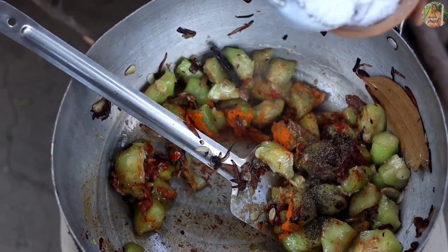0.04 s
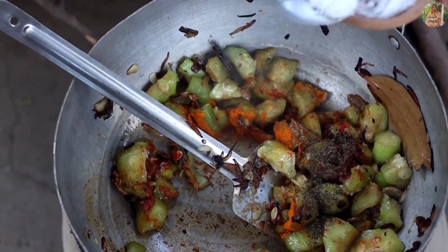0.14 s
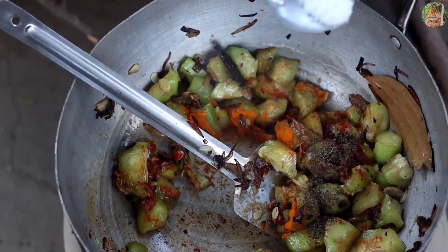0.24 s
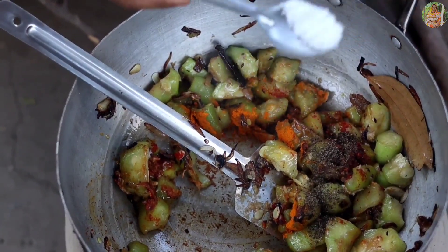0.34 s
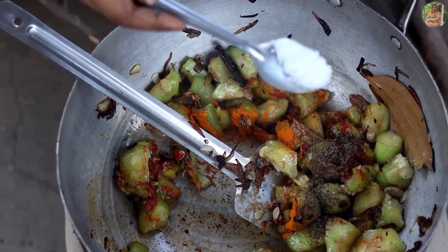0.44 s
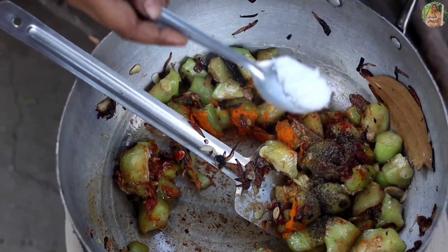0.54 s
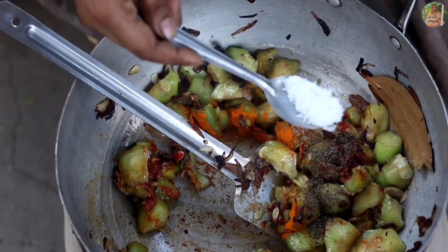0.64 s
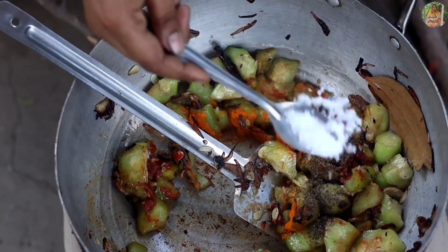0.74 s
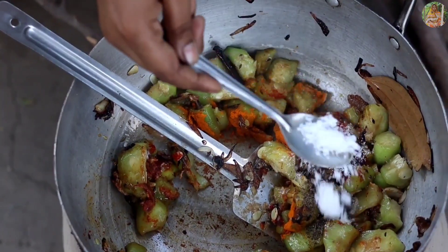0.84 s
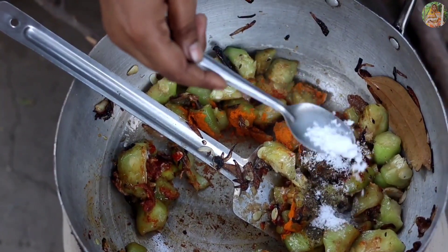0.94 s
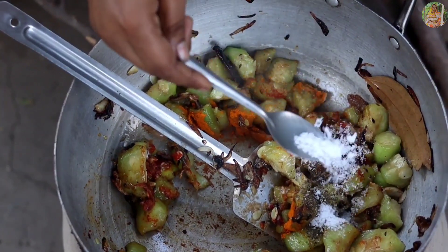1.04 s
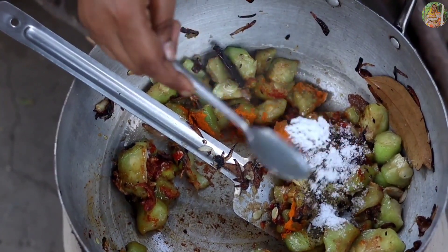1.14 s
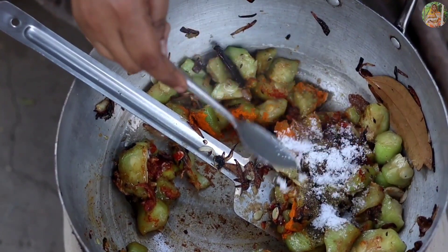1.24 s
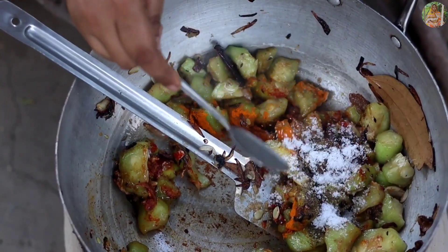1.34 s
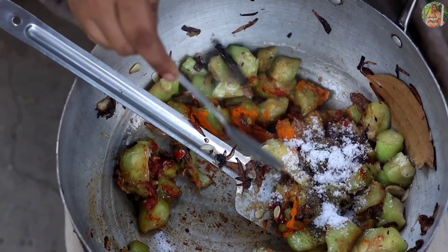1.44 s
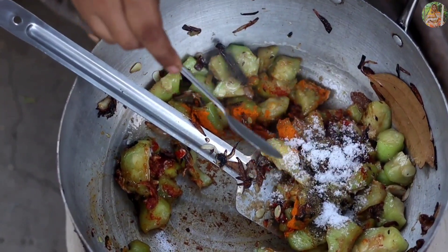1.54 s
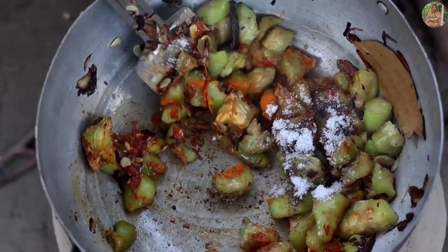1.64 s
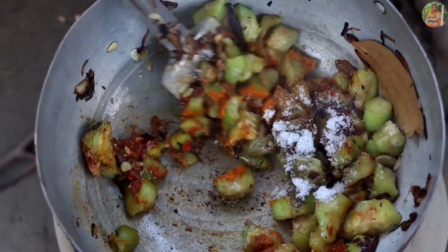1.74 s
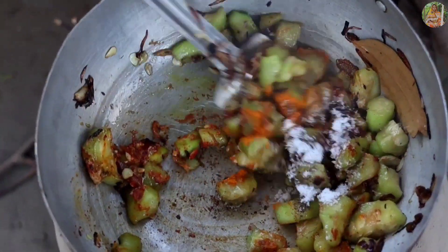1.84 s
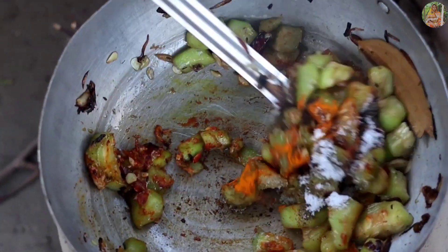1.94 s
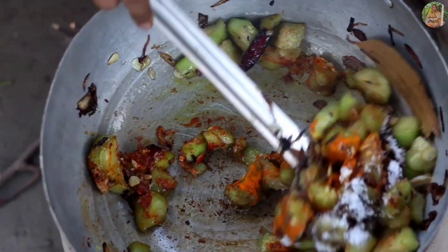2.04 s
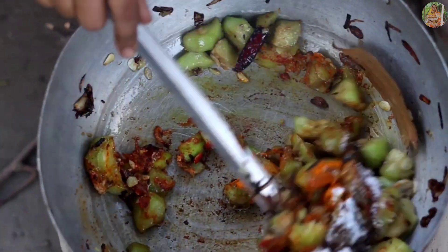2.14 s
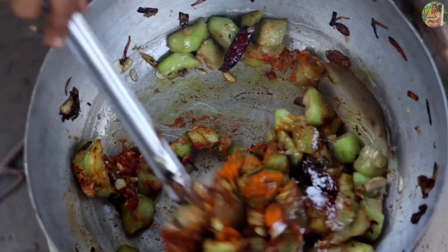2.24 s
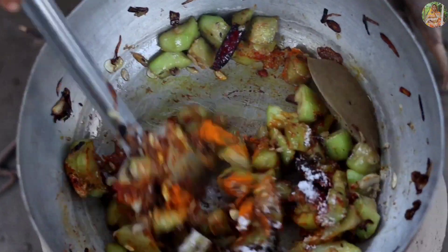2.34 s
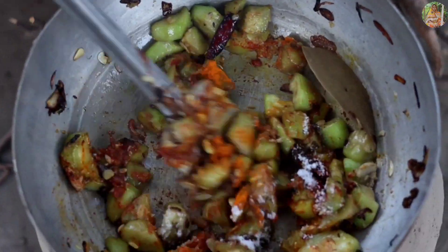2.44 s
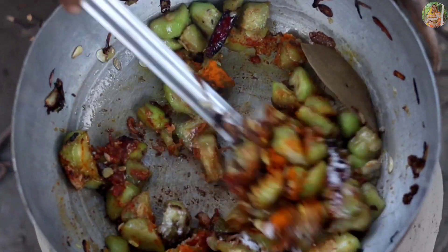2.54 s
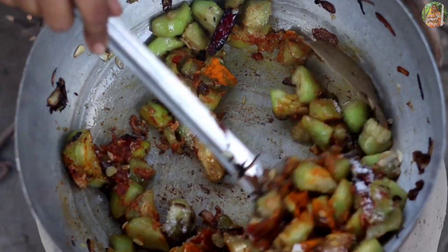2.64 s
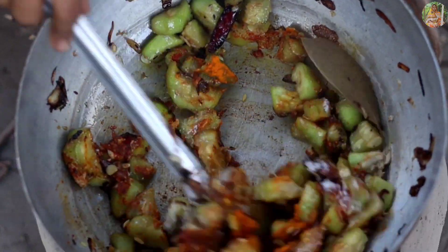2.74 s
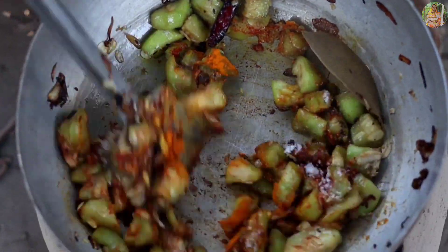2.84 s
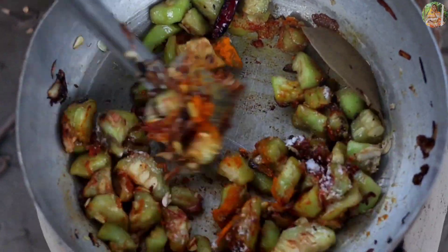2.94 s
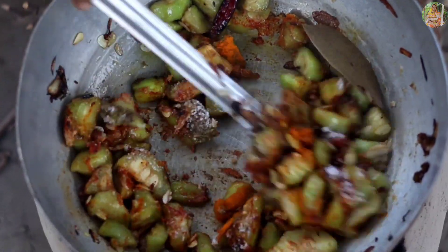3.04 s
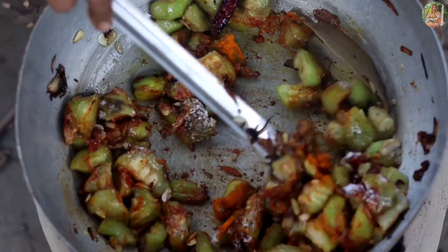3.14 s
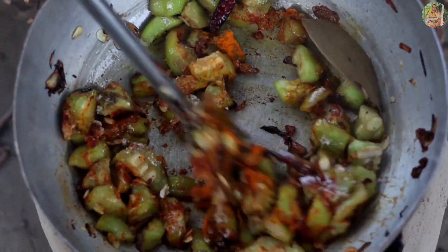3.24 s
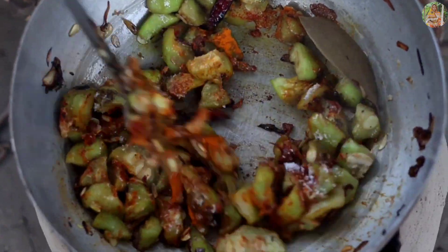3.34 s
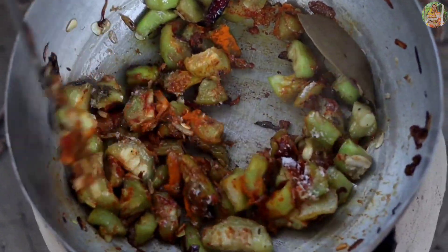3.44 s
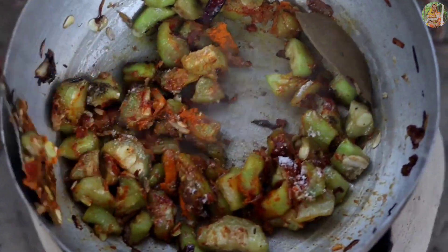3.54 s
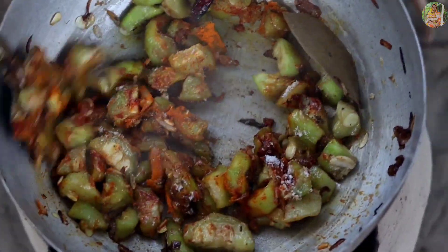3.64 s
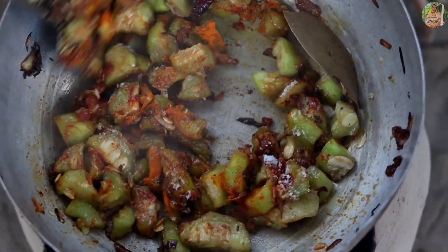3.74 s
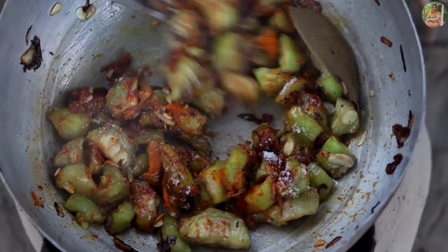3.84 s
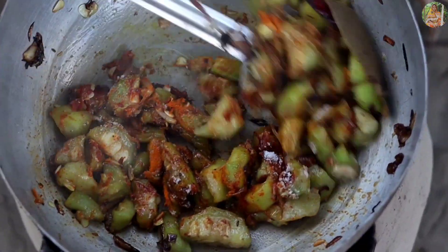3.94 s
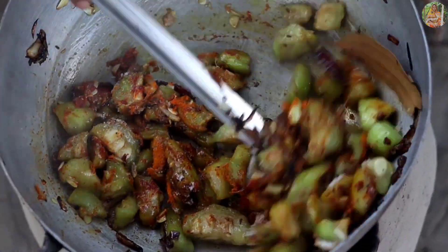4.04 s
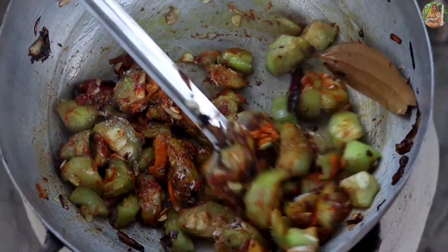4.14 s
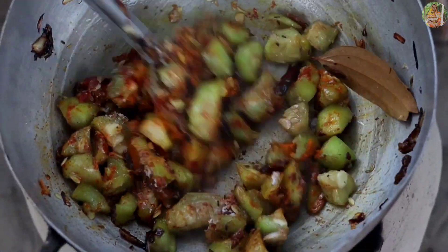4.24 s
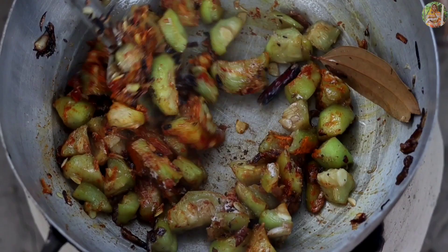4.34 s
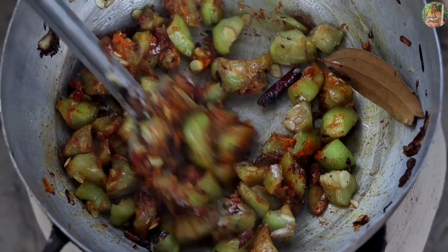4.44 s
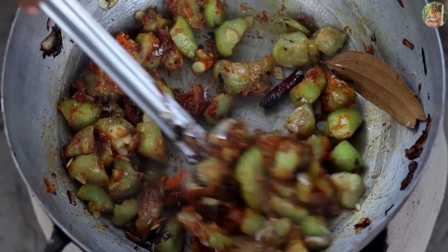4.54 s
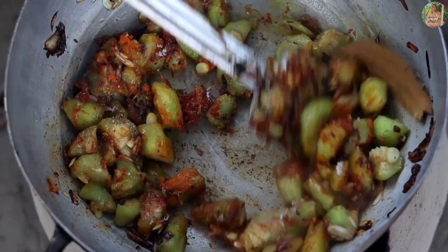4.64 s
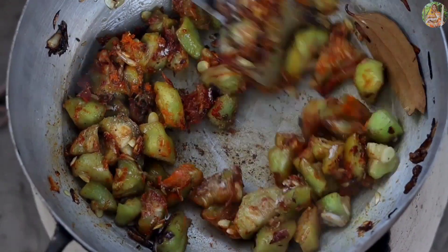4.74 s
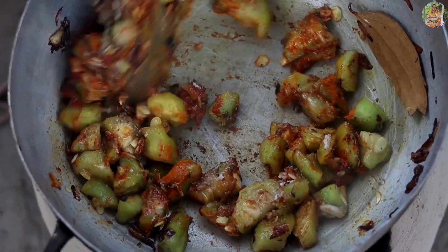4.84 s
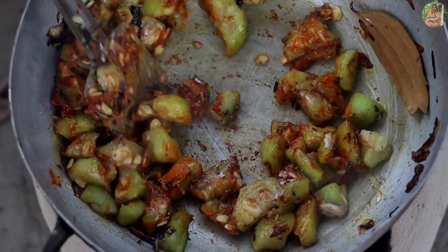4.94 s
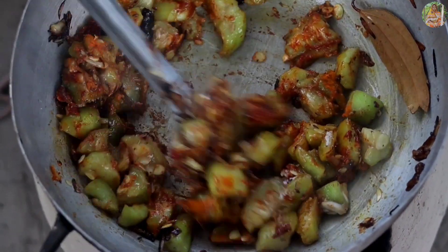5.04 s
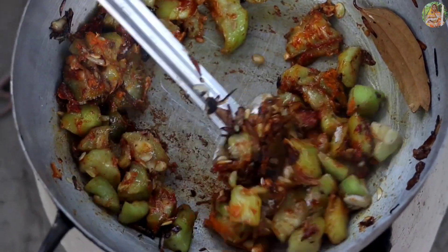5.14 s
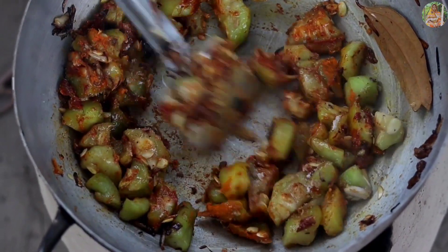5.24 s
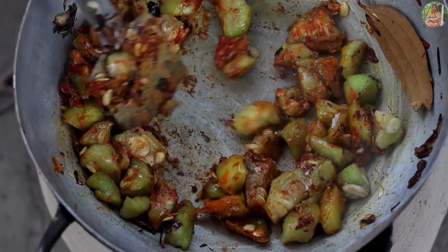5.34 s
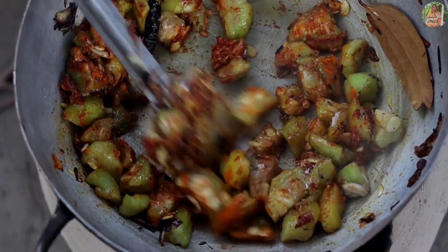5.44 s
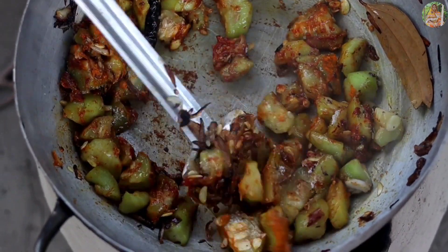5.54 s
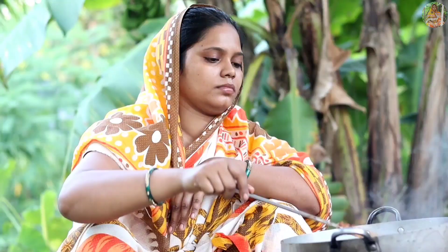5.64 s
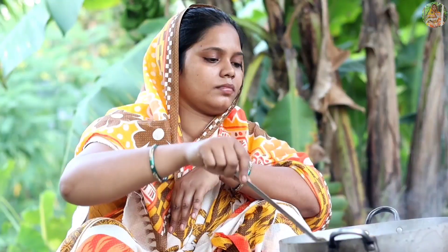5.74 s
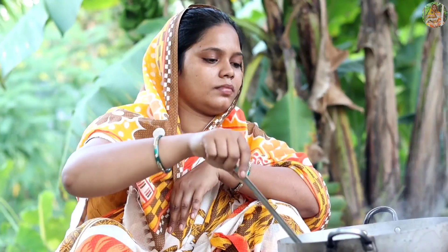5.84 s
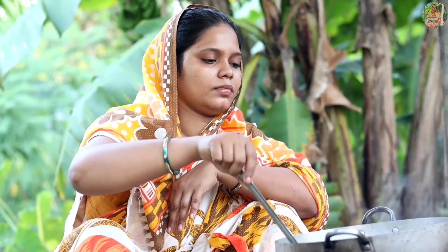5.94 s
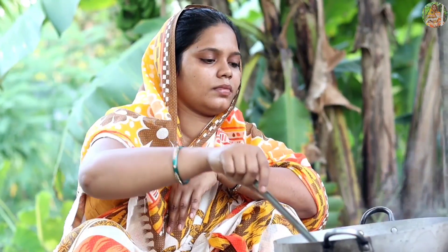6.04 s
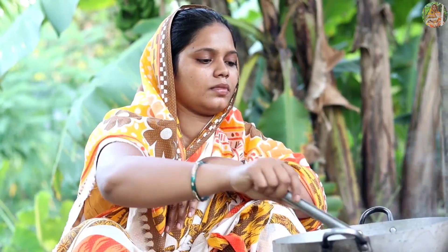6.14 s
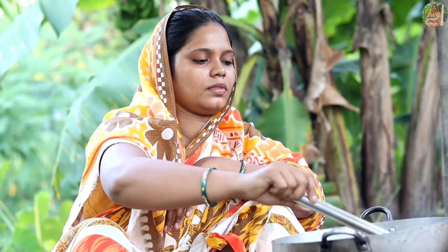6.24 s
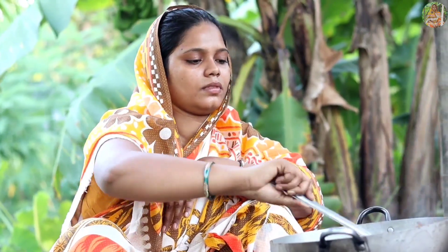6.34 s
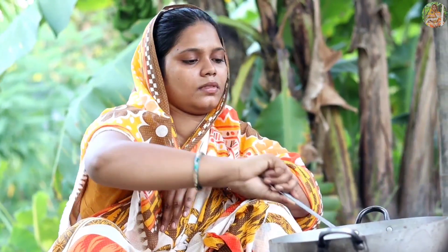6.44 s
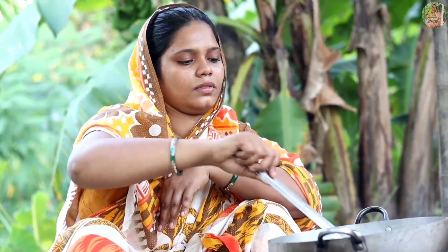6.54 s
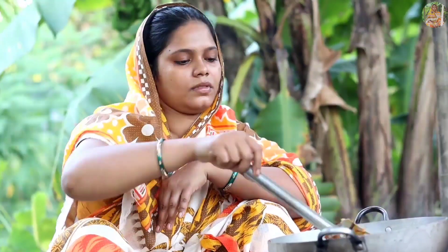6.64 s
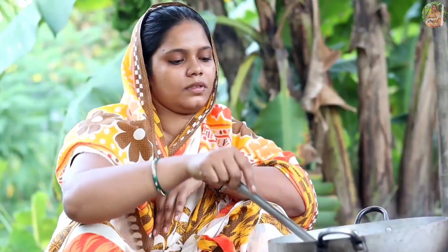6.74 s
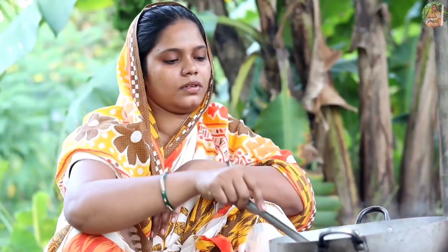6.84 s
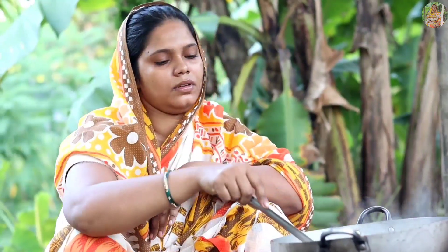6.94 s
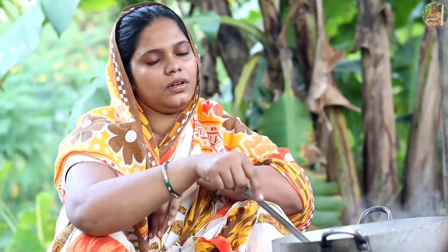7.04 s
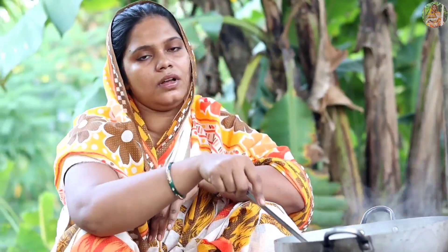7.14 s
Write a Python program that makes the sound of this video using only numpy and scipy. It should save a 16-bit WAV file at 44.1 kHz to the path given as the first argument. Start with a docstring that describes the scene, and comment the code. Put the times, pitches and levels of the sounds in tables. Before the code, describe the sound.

Vegetables sizzle steadily in oil in a wide metal pan, close by and outdoors. Salt patters lightly on them, then a metal spatula turns the food, each turn flaring into a hiss, with scrapes, brief squeaks and light knocks. Near the end the pan is a few steps away, with a faint sizzle, short scrapes and two knocks. Distant engines drone faintly over a low rumble.

```python
"""A steady sizzle is heard first: vegetables fry outdoors in a wide metal pan, as tiny steam bursts in oil.
Salt patters on them; then a metal spatula turns them, and each turn flares into a hiss. Stick-slip
friction makes the blade scrape and squeak; its knocks and one soft thud of falling food ring the pan.
Near the end the pan is a few steps away: a faint sizzle, short scrapes and two knocks.
Far engines drone over a low rumble."""
import sys
import numpy as np
from scipy import signal
from scipy.fft import rfft, irfft, next_fast_len
from scipy.io import wavfile

SR = 44100
rng = np.random.default_rng(int(sys.argv[2]) if len(sys.argv) > 2 else 0)


def transcribe(signal):
    """Save signal, clipped to [-1, 1], as a 16-bit WAV file at the path in sys.argv[1]."""
    frames = np.atleast_2d(signal).T
    limited = np.clip(frames, -1, 1)
    pcm = np.round(limited * 32767).astype(np.int16)
    wavfile.write(sys.argv[1], SR, pcm)


N = 316880
T = np.arange(N) / SR

# sizzle spectra of resting food, stirred food and the pan from afar: (frequency [Hz], gain [dB])
RESTING_SPECTRUM = [(88, -70), (150, -30), (436, -12.5), (471, -15), (618, -12), (985, -16), (1150, -12),
                    (1400, -10.5), (1600, -6.5), (1830, -8.5), (2230, -6), (8170, -3), (15500, -20.5)]
STIRRED_SPECTRUM = [(88, -53), (150, -20), (285, -19), (445, -9.5), (530, -12.5), (1630, -8), (1910, -8.5),
                    (4650, -2.5), (6600, -3), (8490, 1), (10700, -6), (13300, -5.5), (15500, -12)]
FAR_SPECTRUM = [(71, -24), (120, -8.5), (216, -13), (367, -11), (509, -6.5), (552, -14), (704, -18),
                (863, -14), (936, -20), (1080, -16.5), (1190, -19.5), (1410, -12.5), (1650, -15),
                (8770, -10), (15500, -29)]
# resonances (+) and hollows (-) of the pan's bowl: (frequency [Hz], width [Hz], gain [dB])
BOWL_RESONANCES = [(453, 68, 1), (1080, 37, 1.5), (1626, 150, 3.5), (1913, 240, -3.5), (6570, 720, -2.5),
                   (8270, 1500, 1), (10850, 1260, -4.5), (12700, 2100, 1)]
# spatula turns: (time [s], push length [s], level [dB], relative spatter [dB], relative spray [dB])
FOOD_TURNS = [(1.75, .21, -27.5, -4, -4), (2.15, 0.13, -26.5, -2, -4.5), (2.33, 0.11, -26.6, 1, -7.6),
              (2.82, 0.18, -26, -1.2, -8), (3.03, .07, -31, -9.5, -11), (3.29, .09, -28, -2.5, -7),
              (3.44, .14, -27.5, -1, -8.5), (3.73, 0.22, -28, -1.6, -7), (4.14, 0.13, -30, -0.5, -4),
              (4.3, 0.082, -25.5, -2, -4.5), (4.49, 0.087, -26, -7.5, -9), (4.78, 0.087, -25.5, -3.5, -9),
              (4.97, 0.12, -31, 1, -8), (5.3, .1, -28, -3.5, -7), (5.44, 0.12, -29.5, -2.5, -3.5),
              (5.7, .14, -31.5, -3.5, -9)]
# modes of the free pan: (frequency [Hz], level [dB], time to decay by 60 dB [s])
PAN_MODES = [(254.6, -12, 0.33), (308, -13, 0.24), (368, -7.5, 0.2), (397, -3, 0.11), (460.5, 1, 0.14),
             (484, -1.5, 0.08), (510, 0, 0.08), (590, -6, 0.059), (653, -12, 0.09), (782, -12, .08),
             (847, -15.5, 0.21), (938, -12.5, 0.18), (1036, -12.5, 0.48), (1077, -7.5, 0.14),
             (1322, -16.5, 0.48), (1400, -13, 0.13), (1460, -9, 0.13), (1503, -6.5, 0.12),
             (1665, -4, 0.043), (1830, -11, 0.083), (1920, -4.5, 0.082), (1990, -9.5, 0.29),
             (2530, -12, .1), (2760, -20, .12)]
# rasp spectrum of the steel edge: (frequency [Hz], gain [dB])
EDGE_SPECTRUM = [(300, -66), (1000, -15), (2000, -13), (2600, -2.5), (3200, -8), (3900, -13), (4700, -4),
                 (6200, 1), (8200, 4.5), (10500, -8.5), (13000, -12), (15500, -17)]
# resonances of the spatula: (frequency [Hz], width [Hz], gain [dB])
SPATULA_RESONANCES = [(2150, 200, 12), (2360, 200, -8), (3030, 130, 10), (3430, 400, -6), (4630, 250, 8),
                      (5230, 200, 6), (5720, 200, 4), (6600, 200, 3), (6760, 180, -2), (7200, 160, 0),
                      (7550, 150, 4), (9150, 490, 3), (11400, 200, -6)]
# blade strokes: (time [s], length [s], pan ring level [dB], rasp drive [dB], favoured pitch [Hz])
BLADE_STROKES = [(1.923, 0.26, -42.5, -47, 1500), (2.419, 0.31, -44.5, -44, 1400),
                 (3.13, 0.13, -42, -52, 1100), (4.52, 0.091, -41, -30, 1300), (4.869, .05, -42, -31, 900),
                 (5.036, 0.046, -33.5, -42, 750), (5.075, 0.037, -38, -32.5, 2400),
                 (5.124, 0.043, -38.5, -26, 1400), (5.825, 0.048, -39.5, -40, 1600),
                 (5.988, .034, -44, -33.5, 480), (6.046, .022, -48, -47, 480),
                 (6.104, 0.13, -51.5, -42, 1200), (6.197, .07, -40.5, -33.5, 654),
                 (6.275, 0.1, -45.5, -56, 560), (6.362, 0.023, -27, -32, 480), (6.387, .036, -33, -38, 520),
                 (6.421, 0.12, -46.5, -42, 1150)]
# catches of the blade: (time [s], length [s], pitch [Hz], level [dB])
BLADE_CATCHES = [(1.95, .04, 1650, -39), (4.883, .035, 808, -39), (5.069, .032, 1765, -31.5),
                 (5.122, .022, 1446, -34), (5.124, .016, 4840, -26.5), (6.09, .1, 4520, -49),
                 (6.195, 0.075, 1900, -43), (6.197, .022, 5980, -34), (6.381, 0.037, 1525, -33)]
# knocks of the spatula and, at 3.656 s, one soft thud of food dropping on the pan:
# (time [s], level [dB], favoured pitch [Hz], ring time [share of the free pan's])
PAN_BUMPS = [(2.698, -40, 419, 0.72), (3.205, -42.5, 400, 0.77), (3.631, -39, 420, 0.37),
             (3.656, -41.5, 200, 0.44), (4.062, -40.5, 430, .45), (6.366, -27, 1380, 1),
             (6.926, -30.5, 430, 0.41)]
# speeds of two engines: (time [s], firing rate [Hz])
SLOW_ENGINE_SPEED = [(1.8, 19.5), (2.33, 19.6), (2.57, 20.4), (3.9, 21.0), (4.5, 22.8)]
FAST_ENGINE_SPEED = [(3.0, 24.9), (4.27, 28.5), (4.59, 28.76), (4.9, 30.8), (5.65, 27.2), (5.86, 29.0)]
# their harmonics: (order [multiple of the firing rate], level [dB])
SLOW_HARMONICS = [(4, -64.5), (5, -60), (6, -65.5), (7, -67)]
FAST_HARMONICS = [(2, -60.5), (3, -58)]
# outdoor rumble: (frequency [Hz], gain [dB])
RUMBLE_SPECTRUM = [(20, -23), (40, 0), (75, -3), (110, 6), (160, -3.5), (260, -8.5), (500, -27.5)]

STIR_S, STEP_BACK_S = 1.79, 5.875  # stirring begins; the listener steps away
# steady frying, at rest and between turns; coarse spatter and fine spray are relative to the level
REST_DB, REST_SPATTER_DB, REST_SPRAY_DB, WARMING_DB_PER_S = -37, -3, -6, 1.2
SIMMER_DB, SIMMER_SPATTER_DB, SIMMER_SPRAY_DB = -33, -3.5, -4.5
SPATTER_HZ, CORE_HZ, SPRAY_HZ = (2200, 5500), (6500, 10000), (11000, 15000)


def near_sizzle():
    """Rapid boiling: resting food crackles; stirred, its wet faces meet hot metal and the bursts crowd."""
    resting = steam_bursts(rate=2600, spread_db=2.5, pop_db=-2, hiss_db=-2.5)
    stirred = steam_bursts(rate=5000, spread_db=1.5, pop_db=-2, hiss_db=-1)
    resting = colour(resting, RESTING_SPECTRUM, BOWL_RESONANCES)
    stirred = colour(stirred, STIRRED_SPECTRUM, BOWL_RESONANCES)
    stirring = np.clip((T - STIR_S) / 0.09 + .5, 0, 1)
    level_db, spatter_db, spray_db = frying_levels(stirring)
    out = 0
    for sizzle, share in ((resting, 1 - stirring), (stirred, stirring)):
        # an echo off the moving blade and the pan wall combs the hiss
        lag_s = 0.000914 * np.exp(0.328 * walk(2.5) * stirring)
        sizzle = sizzle + 0.087 * np.interp(T - lag_s, T, sizzle)
        out = out + np.sqrt(share) * balance_bursts(sizzle, spatter_db, spray_db)
    nearby = np.clip((STEP_BACK_S - T) / 0.076 + .5, 0, 1)
    return out * undb(level_db + 0.5 * walk(45)) * nearby


def steam_bursts(rate, spread_db, pop_db, hiss_db):
    """Shot noise of steam in oil: broad snaps, resonant pops and the hiss of countless tinier bursts."""
    snaps = unit(clicks(rate, spread_db))
    pops = 0
    for hz in np.geomspace(700, 14000, 18):
        # each bubble size rings for a few cycles and comes in its own flurries
        ring = signal.lfilter(*signal.iirpeak(hz, Q=4.5, fs=SR), clicks(rate * hz / 30000, spread_db))
        pops = pops + unit(ring) * np.sqrt(hz) * undb(3 * walk(35))
    return unit(snaps + undb(pop_db) * unit(pops) + undb(hiss_db) * rng.standard_normal(N))


def balance_bursts(sizzle, spatter_db, spray_db):
    """Size sets pitch: coarse spatter and fine spray wax and wane on either side of a core band."""
    spatter_rms, core_rms, spray_rms = (np.std(band(sizzle, *hz)) for hz in (SPATTER_HZ, CORE_HZ, SPRAY_HZ))
    lowpasses = (signal.butter(3, hz, fs=SR, output="sos") for hz in (1700, 6200, 10500))
    deep, below_core, below_spray = (signal.sosfiltfilt(sos, sizzle) for sos in lowpasses)
    spatter, core, spray = below_core - deep, below_spray - below_core, sizzle - below_spray
    spatter_gain = undb(spatter_db) * core_rms / spatter_rms
    spray_gain = undb(spray_db) * core_rms / spray_rms
    deep_gain = spatter_gain ** 0.098  # the deepest bursts follow the spatter only in part
    return (deep * deep_gain + spatter * spatter_gain + core + spray * spray_gain) / core_rms


def frying_levels(stirring, drying_s=0.25):
    """Incoherent sources add in power: gives the level, relative spatter and relative spray in dB."""
    parts = [(1 - stirring, REST_DB + WARMING_DB_PER_S * T, REST_SPATTER_DB, REST_SPRAY_DB),
             (stirring, SIMMER_DB, SIMMER_SPATTER_DB, SIMMER_SPRAY_DB)]
    parts += [(flare(s, push_s, drying_s), *levels) for s, push_s, *levels in FOOD_TURNS]
    power = sum(np.outer(undb([0, spatter_db, spray_db]) ** 2, steam * undb(db) ** 2)
                for steam, db, spatter_db, spray_db in parts)
    core, spatter, spray = 10 * np.log10(power)
    return core, spatter - core, spray - core


def flare(s, push_s, drying_s):
    """Evaporation: steam power grows as wet food is pushed onto hot metal, then decays exponentially."""
    return np.clip((T - s) / push_s, 0, 1) * np.exp(-np.maximum(T - s - push_s, 0) / drying_s)


def far_sizzle(steady_db=-47, turn_db=-44.5):
    """Attenuation with distance: the frying is fainter, duller and smoother, and flares once."""
    bursts = steam_bursts(rate=4000, spread_db=2, pop_db=0.5, hiss_db=1.5)
    sizzle = colour(bursts, FAR_SPECTRUM, resonances=[(1025, 90, 7), (1470, 150, 4.0), (3500, 520, -3)])
    power = undb(steady_db) ** 2 + undb(turn_db) ** 2 * flare(5.99, push_s=.3, drying_s=0.87)
    away = np.clip((T - STEP_BACK_S) / 0.026 + .5, 0, 1)
    return sizzle / np.std(band(sizzle, 4500, 9700)) * np.sqrt(power) * away


def scrapes(slip_rate=1200, grit_rate=7900, ring_share=0.68, bite_db=5.5, bite_s=.015):
    """Stick-slip friction: the blade's many small slips make the pan groan and the edge rasp."""
    body, edge = np.zeros(N), np.zeros(N)
    for s, length, ring_db, rasp_db, contact_hz in BLADE_STROKES:
        size = int(length * SR)
        progress = np.linspace(0, 1, size)
        bite = undb(bite_db * np.exp(-T[:size] / bite_s))  # extra pressure as the blade lands
        pressure = np.minimum(1, np.minimum(progress / 0.066, (1 - progress) / 0.3)) * bite
        slips = clicks(slip_rate, spread_db=3.1, size=SR)[:size] * pressure
        ring = pan_ring(slips, contact_hz, ring_share)
        add(body, s, ring * undb(ring_db) / np.std(ring[:size]))
        grit = clicks(grit_rate, spread_db=2.5, size=SR)[:size] * pressure
        add(edge, s, unit(unit(grit) + .5 * unit(slips)) * undb(rasp_db))
    return body + undb(3.0) * colour(edge, EDGE_SPECTRUM, SPATULA_RESONANCES)


def squeaks(slip_rate=2500, q=9):
    """Resonance: for a moment the slips crowd onto one bending note of the pressed blade."""
    out = np.zeros(N)
    for s, length, hz, db in BLADE_CATCHES:
        size = int(length * SR)
        slips = clicks(slip_rate, spread_db=1.9, size=SR)[:size] * signal.windows.tukey(size, .6)
        resonance = signal.iirpeak(hz, q, fs=SR)
        note = signal.lfilter(*resonance, signal.lfilter(*resonance, np.pad(slips, (0, size))))
        add(out, s, note * undb(db) / np.std(note[:size]))
    return out


def pan_bumps(rattle_s=.002, tick_db=-15, tick_s=.004):
    """Impact excitation: spatula or falling food rings the pan with a push, a rattle and a faint tick."""
    body, edge, t = np.zeros(N), np.zeros(N), T[:SR // 50]
    for s, db, contact_hz, ring_share in PAN_BUMPS:
        force = .3 * unit(rng.standard_normal(len(t)) * np.exp(-t / rattle_s)) / np.sqrt(len(t))
        force[0] += 1  # the push
        ring = pan_ring(force, contact_hz, ring_share)
        add(body, s, ring * undb(db) / np.std(ring[:len(t)]))
        tick = unit(rng.standard_normal(len(t)) * np.exp(-t / tick_s))
        add(edge, s, tick * undb(db + tick_db))
    return body + colour(edge, EDGE_SPECTRUM, SPATULA_RESONANCES)


def pan_ring(force, contact_hz, ring_share):
    """Modal superposition: a force rings the pan's damped modes, chiefly near the favoured pitch."""
    t = T[:SR // 2]
    response = 0
    for k, (hz, db, t60) in enumerate(PAN_MODES):
        gain = undb(db) / np.hypot(1, 1.74 * (hz / contact_hz - contact_hz / hz))
        decay = np.exp(-np.log(1000) * t / (t60 * ring_share))
        # neighbouring modes swing in opposite senses, so the ring takes a few ms to build
        response = response + (-1) ** k * gain * np.sin(2 * np.pi * hz * t) * decay
    return band(signal.fftconvolve(force, response), 230, 9000)  # a thin open shell radiates no bass


def salt(start_s=0.87, end_s=1.32, level_db=-41):
    """Granular impacts: salt slides off a spoon and patters on the food."""
    pour = np.interp(T, [start_s, start_s + 0.09, end_s - .08, end_s], [0, 1, 1, 0])
    return unit(band(clicks(3000, spread_db=2.2), 4900, 7000)) * pour * undb(level_db)


def engine(speed, harmonics, swell_s, end_s, fade_s, before_db, waver_db=2.0):
    """Periodic firing gives a harmonic series; faint at first, the tones swell, waver and fade."""
    firing_hz = np.interp(T, *np.transpose(speed)) * (1 + 0.006 * walk(11))
    phase = 2 * np.pi * np.cumsum(firing_hz) / SR
    envelope = np.interp(T, [swell_s, swell_s + fade_s, end_s - fade_s, end_s], [undb(before_db), 1, 1, 0])
    tones = sum(np.sqrt(2) * np.sin(k * phase) * undb(db + waver_db * walk(5.8)) for k, db in harmonics)
    return envelope * tones


def outdoors(rumble_db=-62.5, lift_db=4.0):
    """Ambient noise: two far engines over a low rumble, which is louder during the close stirring."""
    slow = engine(SLOW_ENGINE_SPEED, SLOW_HARMONICS, swell_s=1.76, end_s=4.7, fade_s=.2, before_db=-10.5)
    fast = engine(FAST_ENGINE_SPEED, FAST_HARMONICS, swell_s=2.99, end_s=6.05, fade_s=.45, before_db=-11)
    lift = np.interp(T, [STIR_S - .1, STIR_S, STEP_BACK_S, STEP_BACK_S + .05], [0, 1, 1, 0])
    rumble = unit(colour(rng.standard_normal(N), RUMBLE_SPECTRUM))
    return slow + fast + rumble * undb(rumble_db + lift_db * lift + walk(3.2))


def clicks(rate, spread_db, size=N):
    """Poisson process: on average `rate` clicks a second, many small and a few large."""
    strength = undb(spread_db * np.minimum(rng.exponential(size=size), 5))
    return (rng.random(size) < rate / SR) * strength * rng.choice([-1, 1], size)


def walk(rate):
    """Random modulation: a glide through `rate` values a second, with a spread near 1."""
    points = rng.standard_normal(4096)
    return 0.97 * np.interp(T * rate, np.arange(len(points)), points)


def colour(x, spectrum, resonances=()):
    """Minimum-phase filter with a smooth spectrum and bell-shaped resonances."""
    size = next_fast_len(N + 8192) // 2 * 2
    f = np.arange(size // 2 + 1) * SR / size
    hz, db = np.transpose(spectrum)
    shape_db = np.interp(np.log(f + 1), np.log(hz), db)
    for centre, width, gain in resonances:
        shape_db = shape_db + gain * np.exp(-2 * ((f - centre) / width) ** 2)
    cepstrum = irfft(np.log(undb(shape_db)))
    cepstrum[1:size // 2] *= 2  # folding the cepstrum makes the filter causal
    cepstrum[size // 2 + 1:] = 0
    return irfft(rfft(x, size) * np.exp(rfft(cepstrum)))[:N]


def band(x, lo_hz, hi_hz):
    """Band-pass filter."""
    return signal.sosfilt(signal.butter(3, [lo_hz, hi_hz], "band", fs=SR, output="sos"), x)


def undb(db):
    """Decibels to amplitude ratio."""
    return 10 ** (np.asarray(db) / 20)


def unit(x):
    """Normalisation to rms 1."""
    return x / np.sqrt(np.mean(x ** 2) + 1e-20)


def add(out, s, x):
    """Superpose x on out from time s."""
    i = int(s * SR)
    out[i:i + len(x)] += x[:N - i]


def scene():
    """Linear superposition: all sources sum at one point, the same in both channels."""
    mono = near_sizzle() + far_sizzle() + salt() + scrapes() + squeaks() + pan_bumps() + outdoors()
    return np.array([mono, mono])


def record(dry):
    """Band limiting: a steep low-pass filter removes the highest treble."""
    return signal.sosfilt(signal.ellip(12, .1, 90, 15450, fs=SR, output="sos"), dry)


dry = scene()
out = record(dry)
transcribe(out)
```